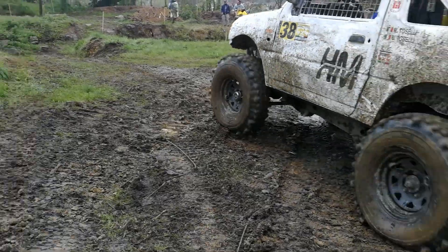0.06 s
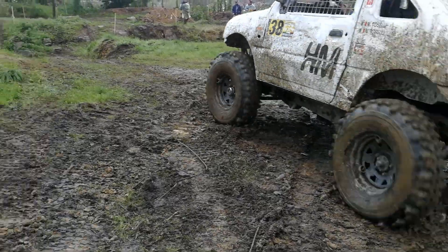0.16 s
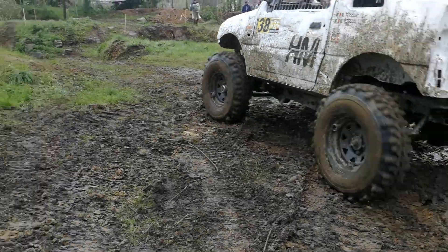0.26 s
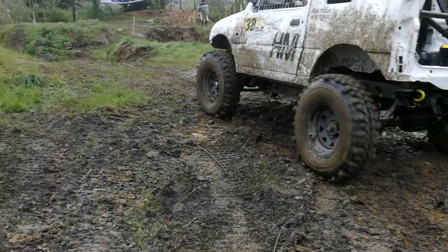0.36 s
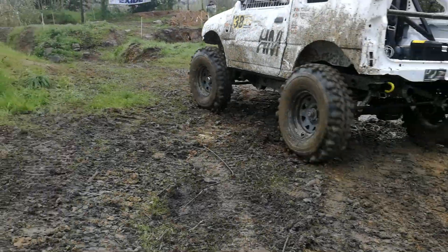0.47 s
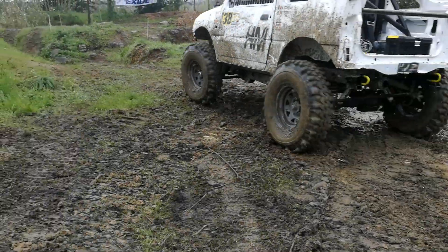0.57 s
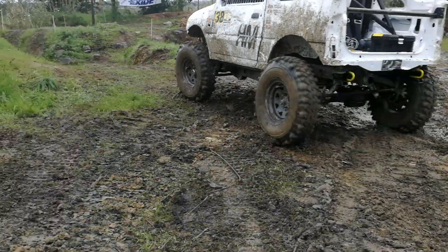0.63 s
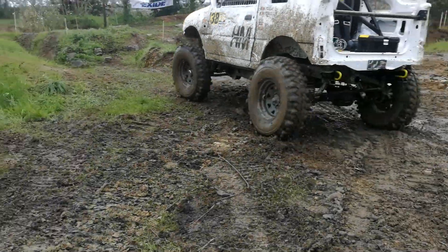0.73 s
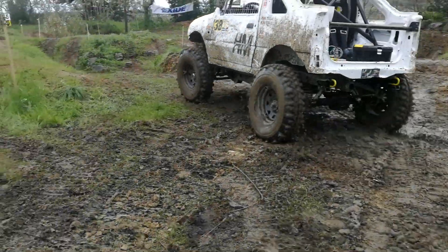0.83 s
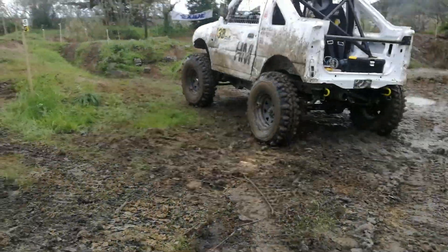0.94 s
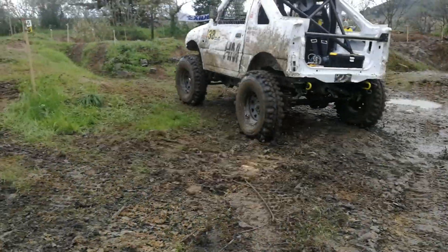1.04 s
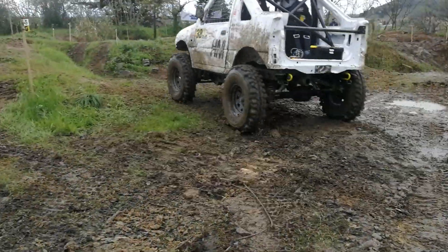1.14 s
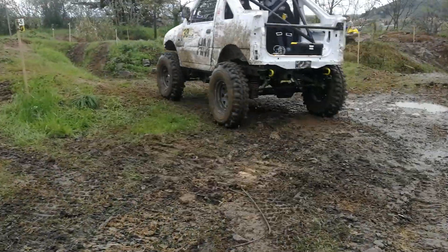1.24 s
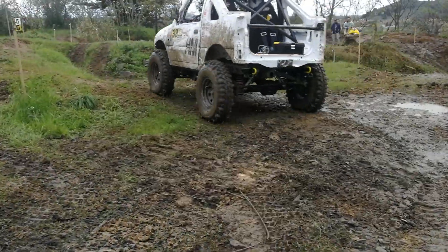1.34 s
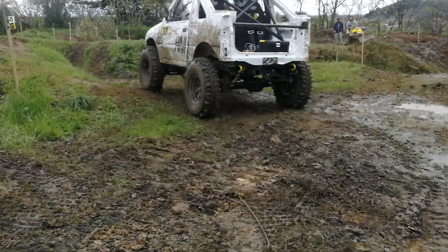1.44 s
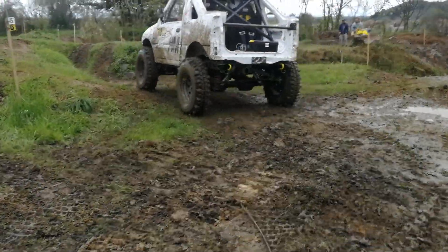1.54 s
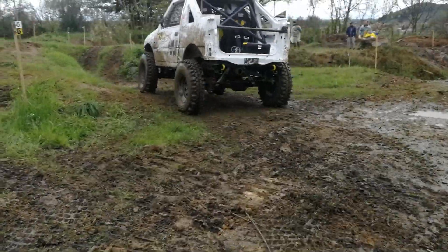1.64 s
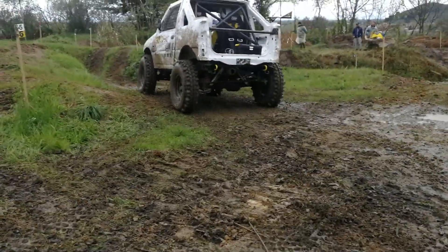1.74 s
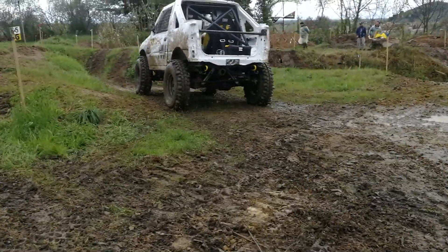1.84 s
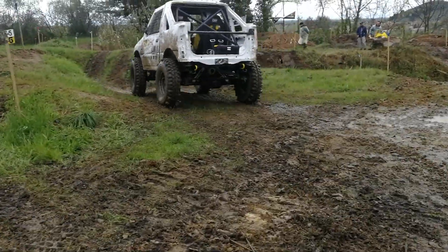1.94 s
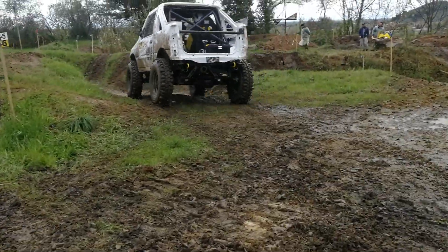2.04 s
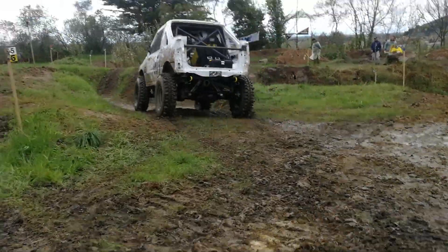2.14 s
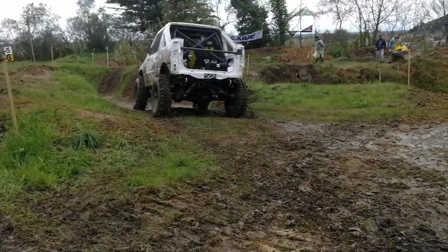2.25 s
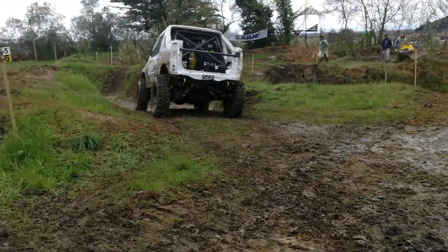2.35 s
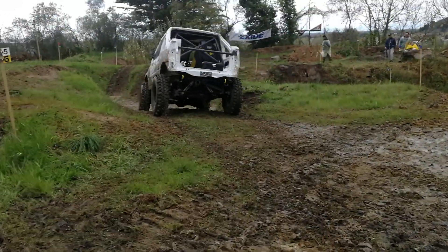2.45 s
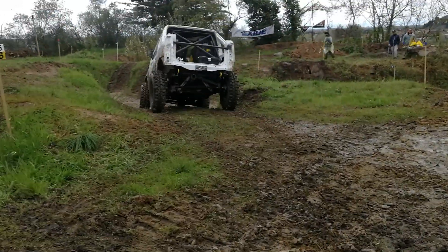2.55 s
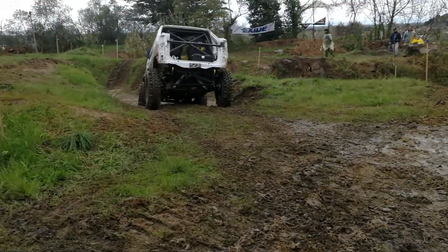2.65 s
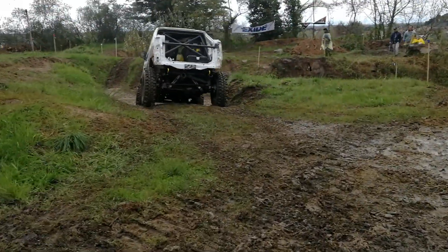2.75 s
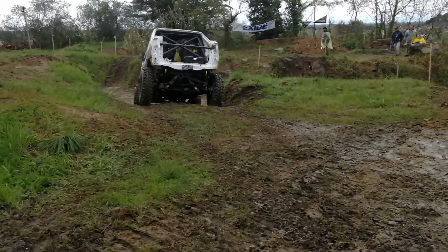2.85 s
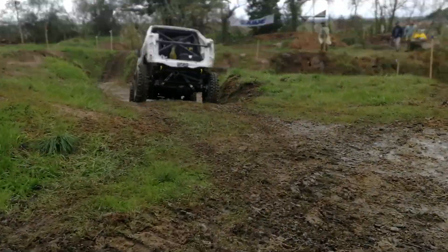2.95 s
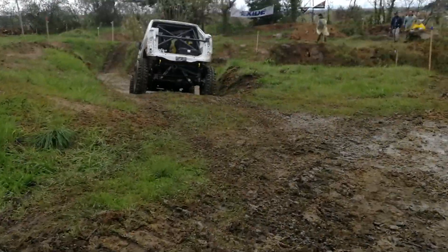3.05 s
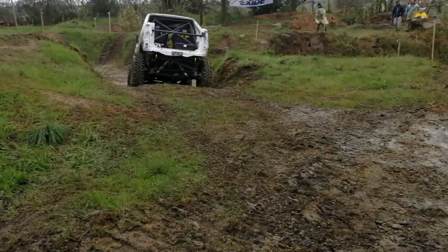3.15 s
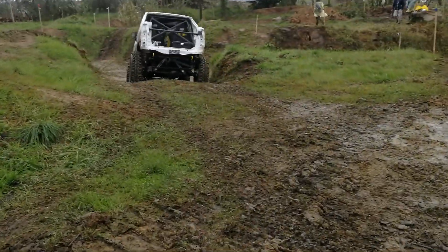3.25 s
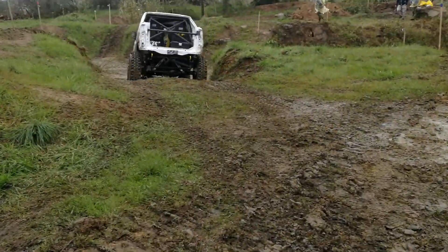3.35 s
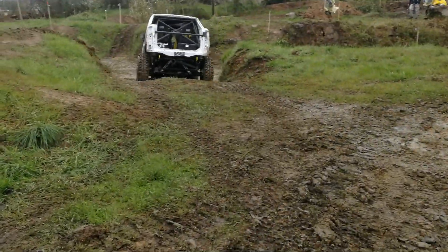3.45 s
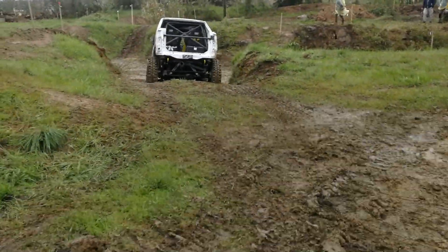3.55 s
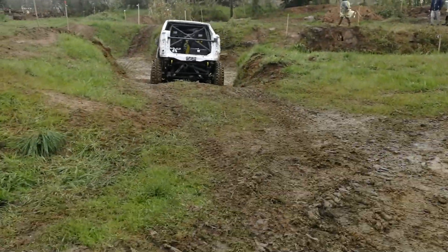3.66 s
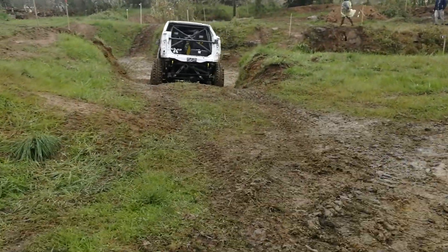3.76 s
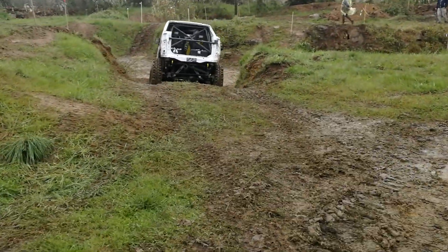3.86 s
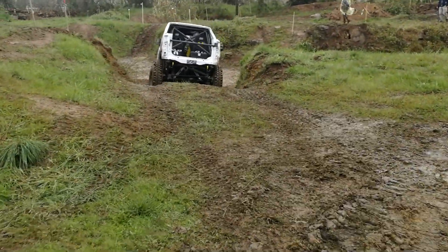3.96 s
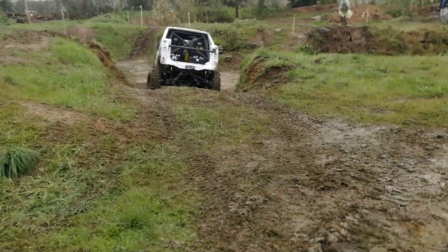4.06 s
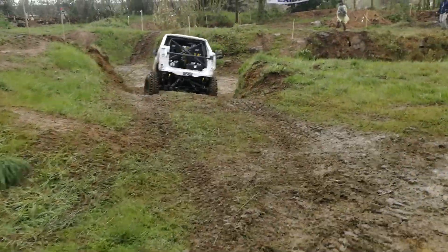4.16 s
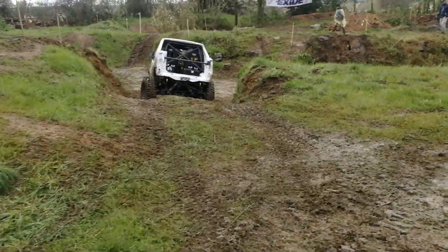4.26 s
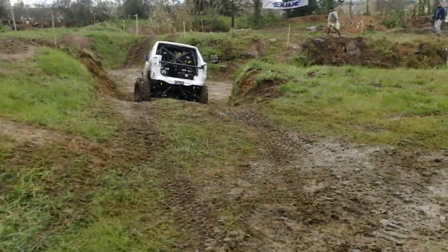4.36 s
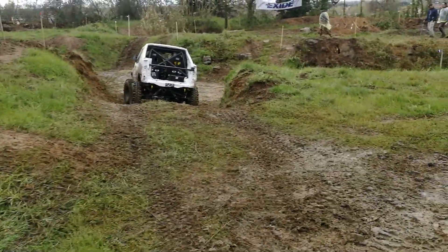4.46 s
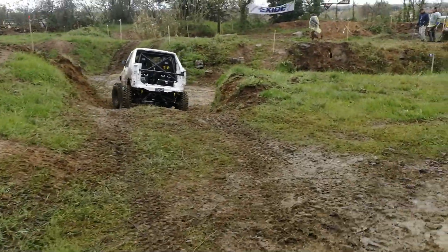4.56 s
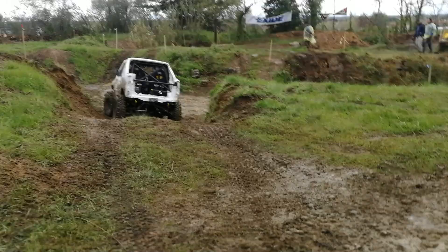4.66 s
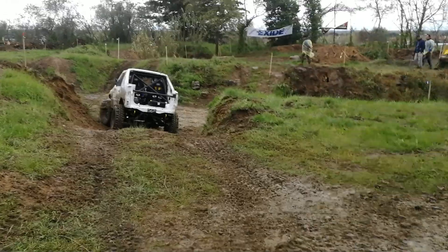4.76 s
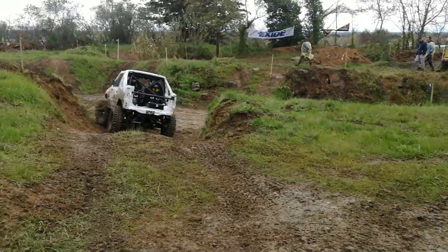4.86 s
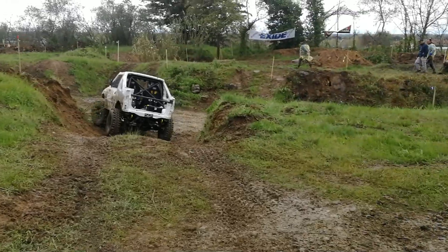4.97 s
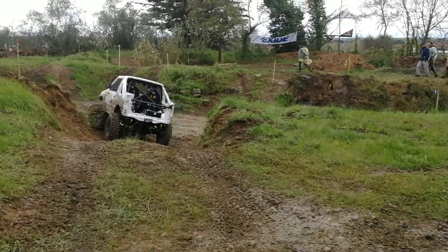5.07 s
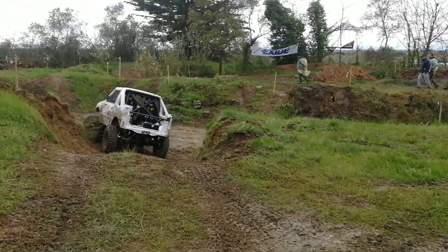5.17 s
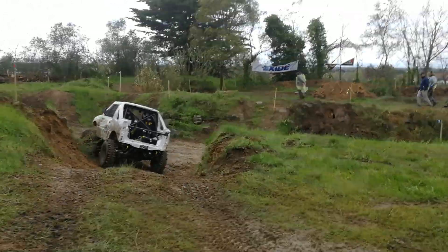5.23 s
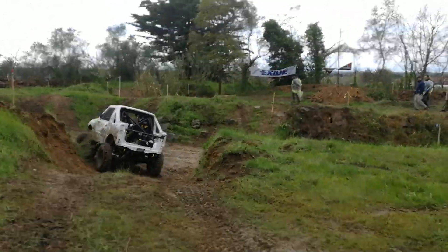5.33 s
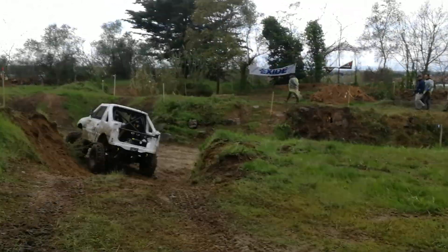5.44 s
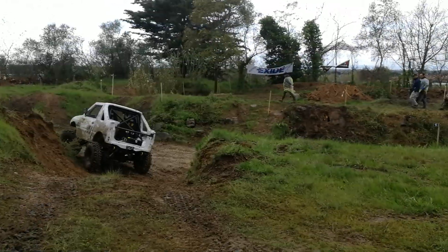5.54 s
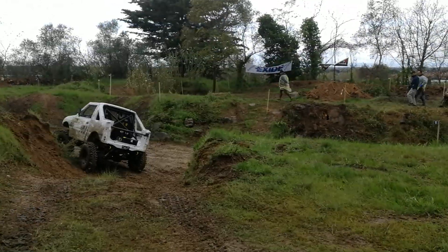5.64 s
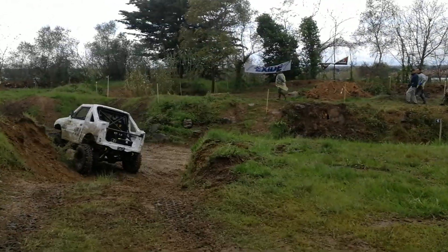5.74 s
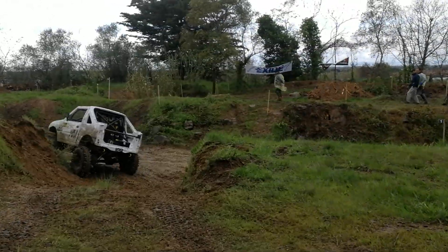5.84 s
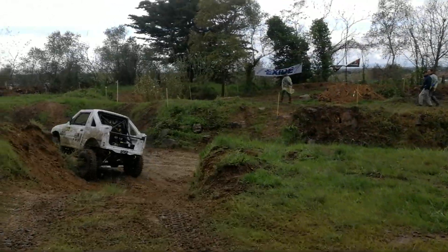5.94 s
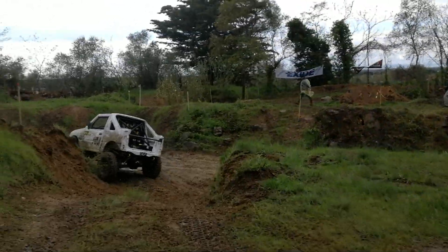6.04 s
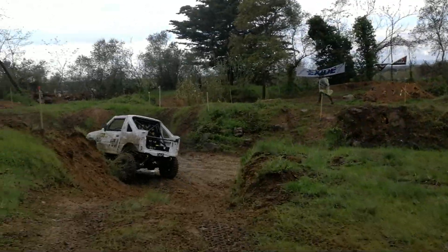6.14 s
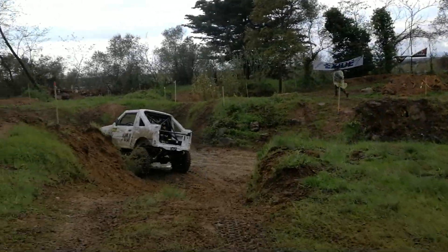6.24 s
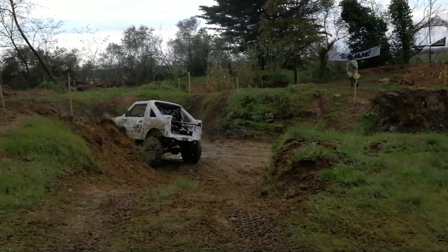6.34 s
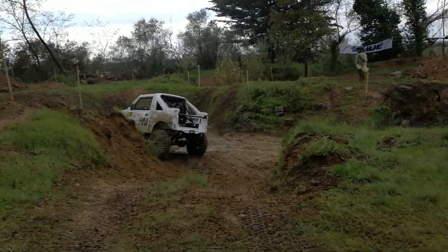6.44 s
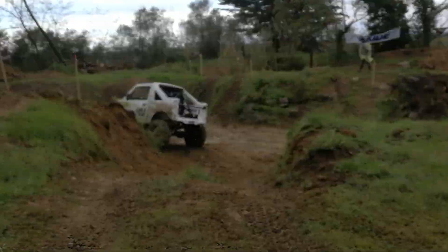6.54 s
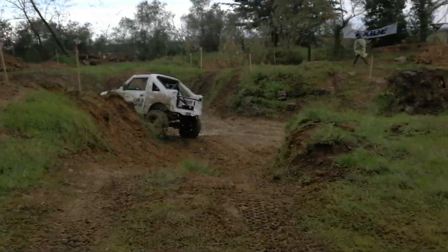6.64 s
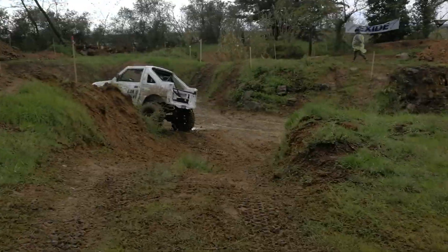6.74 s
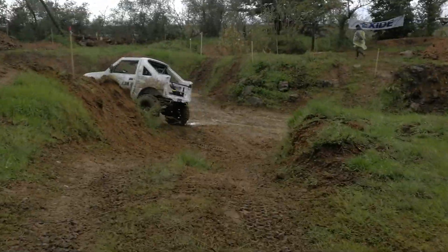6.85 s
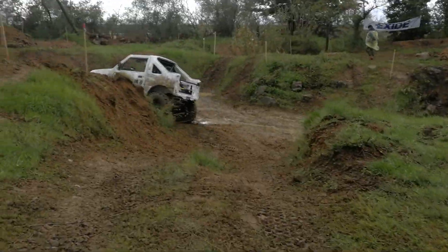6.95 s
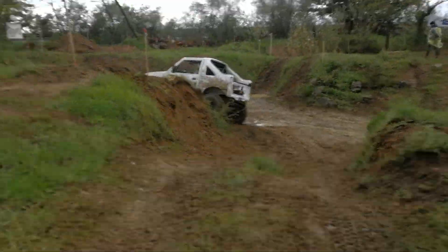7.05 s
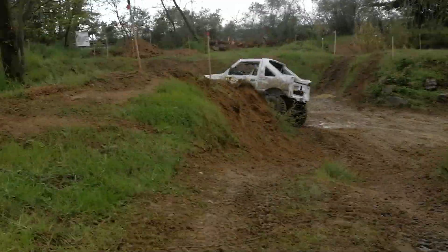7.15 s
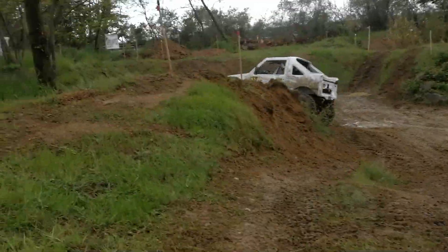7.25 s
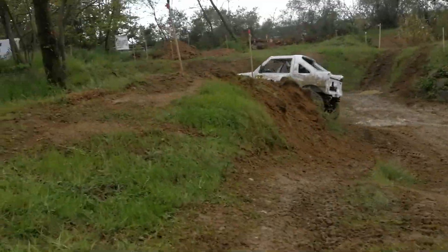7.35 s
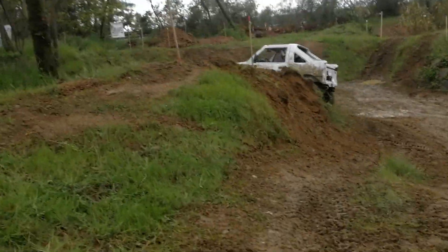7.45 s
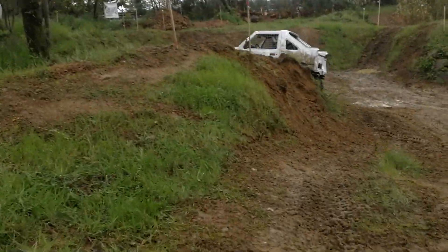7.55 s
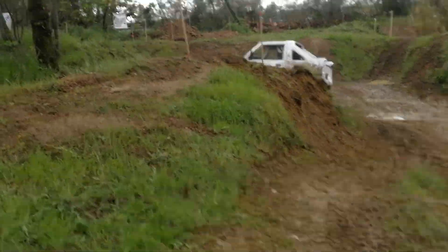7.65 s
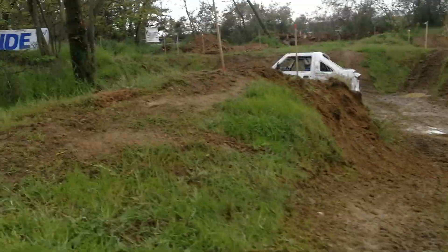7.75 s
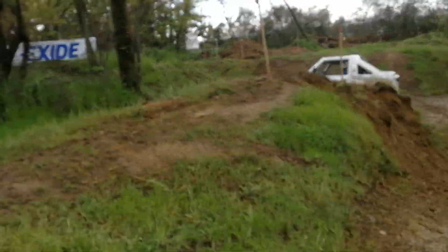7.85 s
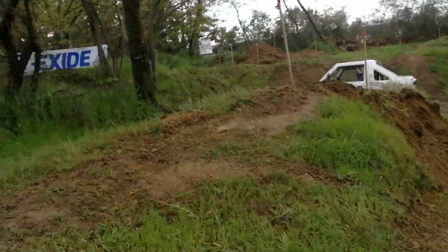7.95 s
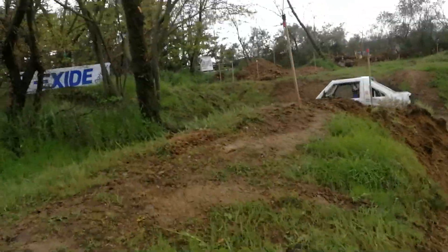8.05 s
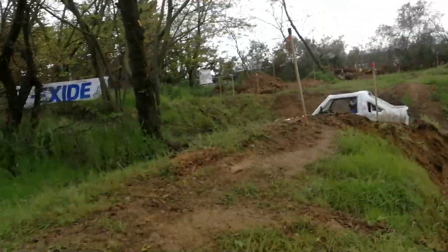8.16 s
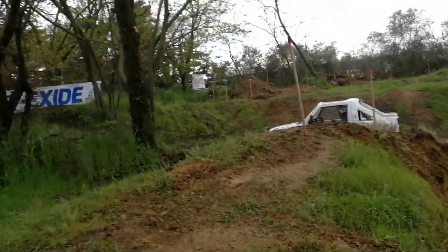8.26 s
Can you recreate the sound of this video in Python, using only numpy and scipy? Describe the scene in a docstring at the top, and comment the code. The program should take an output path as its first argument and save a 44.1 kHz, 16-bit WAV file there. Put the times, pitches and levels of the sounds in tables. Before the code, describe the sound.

An off-road truck's loud open exhaust revs up and down through mud, with sharp backfire bangs as the throttle eases.

```python
"""A four-cylinder off-road truck with an open exhaust pulls through mud and up a bank in bursts of throttle.
Its firings sound the pipe's low note and, under load, make it rasp. On light throttle one cylinder
fires weakly; on lift-off unburnt fuel bangs in the pipe. Tyres squelch, a brake sings faintly and
the chassis knocks, in an open field edged by banks and trees."""
import sys
import numpy as np
from scipy import signal
from scipy.fft import rfft, irfft, next_fast_len
from scipy.io import wavfile
from scipy.ndimage import uniform_filter1d, map_coordinates

SR = 44100
rng = np.random.default_rng(int(sys.argv[2]) if len(sys.argv) > 2 else 0)


def unload_audio(sound):
    """Save the sound as a 16-bit wav file, at the path given as the first command line argument."""
    columns = np.transpose(np.atleast_2d(sound))
    # keep every value between -1 and 1, then stretch to whole-number steps
    steps = np.round(np.clip(columns, -1, 1) * 32767)
    wavfile.write(sys.argv[1], SR, steps.astype(np.int16))


N = 366030
NOW = np.arange(N) / SR
TOP_HZ = 16200
LEFTWARD = np.array([[.5], [-.5]])  # shares a left-minus-right level between the channels


def amp(db):
    """Decibels to gain."""
    return 10 ** (np.asarray(db) / 20)


def unit(x):
    """x at rms 1."""
    return x / np.sqrt(np.mean(x ** 2) + 1e-20)


def along(points, hz):
    """Reads (hz, value) points on a log axis."""
    f, v = np.transpose(points)
    return np.interp(np.log(hz + 1), np.log(f + 1), v)


def curves(rows):
    """One value per sample for each column after the time."""
    s, *cols = np.transpose(rows)
    return [np.interp(NOW, s, c) for c in cols]


def swells(rows):
    """Rounded swells from rows of (middle_s, length_s, height)."""
    return sum(height * np.exp(-np.square(np.square(2 * (NOW - s) / length)))
               for s, length, height in rows)


def wobble(rate):
    """A smooth random curve, rate knots a second."""
    return map_coordinates(rng.standard_normal(int(N * rate / SR) + 4), [NOW * rate])


def white():
    """Two unrelated white noises."""
    return rng.standard_normal((2, N))


def add(track, s, sound):
    """Lays a sound into a track at time s."""
    part = track[..., round(s * SR):][..., :sound.shape[-1]]
    part += sound[..., :part.shape[-1]]


def filtered(x, response):
    """x times a complex response of frequency."""
    m = next_fast_len(N + SR // 2)
    return irfft(rfft(x, m) * response(np.fft.rfftfreq(m, 1 / SR)), m)[..., :N]


def bandpass(x, low_hz, high_hz):
    """x through a gentle band filter."""
    return signal.sosfilt(signal.butter(2, [low_hz, high_hz], "band", fs=SR, output="sos"), x)


def ringing(x, spectrum, size=4096):
    """x through a causal filter with the given spectrum."""
    cepstrum = irfft(np.log(amp(along(spectrum, np.fft.rfftfreq(size, 1 / SR))) + 1e-6))
    cepstrum[1:size // 2] *= 2
    cepstrum[size // 2:] = 0
    kernel = irfft(np.exp(rfft(cepstrum)))
    return filtered(x, lambda hz: rfft(kernel / np.linalg.norm(kernel), 2 * (len(hz) - 1)))


def resonances(modes, hz):
    """Response of modes given as (pitch_hz, width_hz, level_db)."""
    return sum((-1) ** k * amp(db) * 1j * hz * width / (pitch ** 2 - hz ** 2 + 1j * hz * width)
               for k, (pitch, width, db) in enumerate(modes))


# The truck's place in the stereo image: time_s, left_lead_ms, left_minus_right_db
TRUCK_PAN = [(0,-0.21,-8),(.6,-0.14,0),(1.3,0.08,1),(2,0.047,5.5),(3.1,0.14,6),(5.2,0.27,6),(6.6,0.073,6.5),(7.4,0.31,3.5)]


def placed(x, panned=0, delayed=1):
    """One side hears the truck sooner and louder; panned and delayed scale the two cues."""
    lead_ms, tilt_db = curves(TRUCK_PAN)
    samples = np.arange(N)
    shift = delayed * lead_ms * SR / 2000
    pair = np.array([np.interp(samples + side * shift, samples, x) for side in (1, -1)])
    return pair * amp(LEFTWARD * tilt_db * panned)


# Stereo width of the noise layers: frequency_hz, side_minus_mid_db
STEREO_WIDTH = [(60, -29), (110, -18.5), (200, -35), (380, 6), (700, -4), (1290, -12), (2380, 2),
                (4400, -4), (8120, 0.5), (15000, 0)]


def spread(pair, spectrum, panned=0, delayed=1):
    """Two noises become coloured stereo: one from the truck's bearing, one scattered."""
    direct = filtered(pair[0], lambda hz: amp(along(spectrum, hz)))
    side = filtered(pair[1], lambda hz: amp(along(spectrum, hz) + along(STEREO_WIDTH, hz)))
    stereo = placed(direct, panned, delayed) + np.array([side, -side])
    return stereo / np.std(stereo.mean(axis=0))


# Tone of the outdoor bed: frequency_hz, level_db
FIELD_EQ = [(20,4),(45,-10),(100,9),(250,11),(450,-7),(900,-42.5),(1500,-28),(2400,-18),(4000,-27),(16000,-36)]


def open_field():
    """A low rush of air that drifts with the breeze."""
    breeze_db = 2.2 * wobble(4)
    return amp(-40.5 + breeze_db) * spread(white(), FIELD_EQ, delayed=0)


# Reverb time of the banks and trees: frequency_hz, t60_s
BANK_DECAY = [(200,0.041),(1000,0.23),(4000,0.089),(12000,0.2)]


def bank_echo(x):
    """A short scattered answer from the earth banks and trees."""
    hz, t, noise = signal.stft(rng.standard_normal((2, SR // 2)), SR, nperseg=256)
    tail = signal.istft(noise * amp(-60 * t / along(BANK_DECAY, hz)[:, None]), SR, nperseg=256)[1]
    return signal.fftconvolve(x, tail / np.linalg.norm(tail[0]), axes=1)[:, :N]


# Sprays of mud off the tyres: middle_s, length_s, level_db
MUD_SPRAYS = [(0.664, 0.38, -55), (2.777, 0.24, -46.5), (3.03, 0.24, -61), (3.593, 0.36, -53),
              (3.88, 0.16, -53.5), (4.131, 0.072, -54), (4.7, 0.51, -74), (5.122, 0.11, -54),
              (5.366, 0.23, -50.5), (5.851, 0.13, -52), (7.022, 0.05, -59), (7.26, 0.12, -47.5),
              (7.655, 0.23, -48), (7.985, 0.089, -47)]
# Tone of the mid churn, the hiss, the top fizz and the flung specks: frequency_hz, level_db
CHURN_EQ = [(280, -32), (470, -5.5), (515, -24), (570, -14), (641, -7.5), (1010, -11), (1590, -16.5),
            (1880, -18), (2100, -23), (3120, -54.5), (5280, -120)]
HISS_EQ = [(1120, 0.5), (1850, -1.5), (2100, -5.5), (2710, -9.5), (3600, -6.5), (4030, -5), (5420, -11.5),
           (7000, -16), (9100, -38), (15400, -120)]
FIZZ_EQ = [(3240, 0), (5500, -2), (7290, 0), (9070, -3.5), (11300, -15.5), (12800, -15), (15200, -28),
           (15800, -19), (16300, -50)]
SPECK_EQ = [(900,-43),(2200,-8),(4500,4.5),(8000,1.5),(13000,-8.5),(16000,-23.5)]


def tyres_and_mud():
    """Churning mud and the engine bay's rush; they make up the treble when the throttle eases."""
    load, _ = load_and_roughness()
    rasp_db, hiss_db = curves(RASP_AND_HISS)
    pull = swells(HARD_PULLS)
    spray = swells([(s, length, amp(db)) for s, length, db in MUD_SPRAYS])
    wet = lambda depth_db: white() * amp(depth_db * wobble(350) + 2.1 * wobble(30))
    churn = amp(rasp_db - 1.5) * np.sqrt(1 - .88 * np.sqrt(load)) * spread(wet(2), CHURN_EQ, panned=1)
    rush = amp(hiss_db + 3.5) * np.sqrt(1 - np.clip(pull, 0, 1))
    hiss = np.hypot(rush, amp(-19) * spray) * spread(wet(2), HISS_EQ, delayed=0.33)
    fizz_db = hiss_db + 2 - 12.5 * load ** 2 - 3.9 * pull
    fizz = np.hypot(amp(fizz_db), spray) * spread(wet(1.5), FIZZ_EQ, delayed=0)
    # about 110 specks a second: many tiny ticks and a few clear ones
    specks = (rng.random(N) < 110 / SR) * amp(5.5 * rng.standard_normal(N))
    ticks = placed(unit(ringing(specks, SPECK_EQ)), panned=1)
    spatter = amp(-8) * np.hypot(amp(hiss_db), spray) * ticks
    return churn + amp(-2.5 * LEFTWARD) * (hiss + fizz) + spatter


# Suspension and stone hits: start_s, peak_db, pitch_hz
CHASSIS_KNOCKS = [(1.498, -27, 9300), (4.344, -35, 2420), (4.835, -30.5, 5390), (6.97, -35, 8840),
                  (7.03, -38, 9380), (7.251, -35, 980), (7.614, -39, 894), (7.698, -39, 900),
                  (7.801, -29.5, 997), (7.805, -34, 445), (7.922, -39, 600), (7.865, -29.5, 509),
                  (7.947, -32, 648), (7.975, -30, 720), (8.002, -28, 1550), (8.051, -36, 1312),
                  (8.096, -32, 715), (8.213, -35.5, 6220), (8.253, -30, 4800)]
# Thin singing tones, from the brakes and once from the pipe: middle_s, length_s, pitch_hz, level_db
THIN_SQUEALS = [(1.645, .11, 443, -33), (2.126, 0.12, 3366, -48.5), (3.23, 0.2, 3300, -53),
                (4.355, 0.08, 2310, -50)]
# Metallic scrapes, rings and clinks: middle_s, length_s, pitch_hz, width_hz, level_db
METAL_SCRAPES = [(.04, 0.22, 1410, 400, -31.5), (.04, .2, 3200, 1300, -39.5), (1.36, 0.27, 1900, 250, -47),
                 (3.55, 0.54, 3274, 250, -62), (4.15, 1.4, 2293, 250, -61), (5.866, .035, 3020, 300, -51),
                 (6.117, 0.42, 4200, 1400, -53)]


def chassis():
    """Short knocks from the suspension and flung stones, fluttering squeals and narrow scrapes."""
    out, t = np.zeros((2, N)), np.arange(SR // 4) / SR
    for s, db, hz in CHASSIS_KNOCKS:
        noise = rng.standard_normal(len(t)) + .5 * rng.standard_normal((2, len(t)))
        knock = bandpass(noise * amp(-60 * t / 0.047), hz * 0.6, min(hz * 1.29, TOP_HZ))
        add(out, s, amp(db) * knock / np.abs(knock).max())
    for s, length, hz, db in THIN_SQUEALS:
        envelope = amp(db + 3 * wobble(37)) * np.exp(-(2 * (NOW - s) / length) ** 2)
        pitch_hz = hz * (1 + 0.0051 * wobble(83))
        out += envelope * np.sin(2 * np.pi * np.cumsum(pitch_hz) / SR)
    for s, length, hz, width, db in METAL_SCRAPES:
        scrape = filtered(white(), lambda f: resonances([(hz, width, 0)], f) ** 2)
        out += swells([(s, length, amp(db))]) * unit(scrape)
    return out


# Bangs, each with its own mix: start_s, crack_db, boom_db, treble_over_crack_db, bark_db, bark_hz
AFTERFIRE_BANGS = [(1.583, -24, -4, -16, -40, 970), (1.606, -18, -4, -28.5, -46, 903.4),
                   (1.637, -27.5, -2.5, -24, -41, 1050), (1.665, -34, -5.5, -30, -33.5, 920),
                   (1.87, 3, -5.5, -9, -36, 1178), (1.976, -4.5, -2.5, -4, -31.5, 1076),
                   (2.22, 3, -4.5, -10, -40, 1132), (2.282, -12.5, -3.5, -1.5, -41, 1199),
                   (2.553, -12.5, -7, 4, -34, 740), (3.054, -8, -7.5, 2.5, -31, 757),
                   (3.189, -39.5, -21, -4, -43, 764), (3.248, -41, -33, -3, -45, 781),
                   (3.456, -13, -12.5, -0.5, -26.5, 800), (3.565, -33.5, -14, -8, -47, 624),
                   (3.641, -42.5, -19, -19, -48, 519), (4.887, -32, -13, -21, -42, 850),
                   (4.907, -36, -17, -22, -37, 690), (4.922, -32, -17, -22, -36, 700),
                   (4.938, -35, -13, -28, -42, 930)]
# The slap off the ground, sooner as the truck draws away: time_s, delay_ms
GROUND_SLAP = [(1.9, 0.69), (2.25, 0.5), (2.55, .42), (3.05, 0.32), (3.5, 0.34), (5, .25)]
# Tone of the crack: frequency_hz, level_db
CRACK_EQ = [(40, -15), (130, 2), (290, 1.5), (600, -2), (850, 2), (1200, 8), (1600, 0), (1950, 6),
            (2400, -3.5), (2850, -1), (4000, -2), (5090, -7.5), (7640, -9), (8500, -14), (12900, -16.5),
            (16000, -24.5)]


def afterfire():
    """Fuel explodes in the pipe: a shock front, its ground bounce, a spit of gas, a bark and a boom."""
    t = np.arange(SR // 4) / SR
    dull, sharp, booms, barks = np.zeros((4, N))
    gas_decay = 0.078 * amp(-60 * t / 0.038) + 0.014 * amp(-60 * t / 0.12)
    for s, crack_db, boom_db, treble_db, bark_db, bark_hz in AFTERFIRE_BANGS:
        shock = rng.standard_normal(len(t)) * gas_decay
        shock[0] += 1
        slap_ms = np.interp(s, *np.transpose(GROUND_SLAP))
        shock[round(slap_ms * SR / 1000)] += 0.52
        bark = bandpass(shock, bark_hz / 1.26, bark_hz * 1.26)
        add(barks, s + 0.00107, amp(bark_db) * bark / np.std(bark[:SR // 40]))
        add(dull, s + 0.001098, amp(crack_db + 11.5) * shock)
        add(sharp, s + 0.001106, amp(crack_db + treble_db + 17.5) * shock)
        add(booms, s + 0.0017, amp([boom_db + 45]))
    body = filtered(dull, lambda hz: 1 / (1 + 1j * hz / 2200) ** 2)
    snap = filtered(sharp, lambda hz: (1j * hz / (1500 + 1j * hz)) ** 2)
    crack = amp(-4.5 - 5 * LEFTWARD) * placed(ringing(body + snap, CRACK_EQ), delayed=0.18)
    return crack + amp(6 * LEFTWARD) * placed(barks) + placed(filtered(booms, pipe))


# The revs: time_s, firing_rate_hz
REVS = [(0.0, 122.5), (0.23, 110.0), (0.42, 113.0), (0.66, 123.5), (0.85, 118.0), (1.04, 110.7),
        (1.35, 121.0), (1.49, 120.0), (1.62, 102.0), (1.77, 97.5), (2.04, 90.6), (2.33, 91.0), (2.64, 74.7),
        (2.9, 76.2), (3.3, 70.6), (3.7, 72.1), (4.0, 77.6), (4.26, 77.3), (4.58, 73.0), (4.72, 63.0),
        (4.86, 58.0), (5.01, 76.0), (5.27, 91.0), (5.48, 86.7), (5.66, 75.2), (6.1, 74.3), (6.32, 78.4),
        (6.65, 100.0), (6.8, 102.0), (6.98, 97.8), (7.33, 77.0), (7.67, 71.0), (7.99, 52.0), (8.15, 51.3),
        (8.3, 54.0)]
# The driver's foot: time_s, note_level_db, load (0-1)
PEDAL = [(0.0, -9, 0.46), (0.22, -12.5, 0.44), (0.58, -9, 0.4), (0.98, -13, 0.4), (1.4, -10, 0.33),
         (1.5, -15, 0.26), (1.56, -19.5, 0.69), (1.66, -13, 0.59), (1.8, -14, 0.67), (2.1, -14.5, 0.69),
         (2.54, -15, 0.54), (2.59, -19.5, 0.17), (2.69, -19, 0.3), (2.73, -15.5, 0.64), (3.05, -17.5, 0.53),
         (3.08, -27.5, 0.57), (3.36, -22, 0.35), (3.62, -35.5, 0.28), (4.05, -19.5, 0.02),
         (4.45, -30, 0.32), (4.6, -30.5, 0.28), (4.68, -23.5, 0.13), (4.82, -27.5, .1), (4.865, -41, 0.18),
         (4.9, -20.5, 0.16), (5.25, -14.5, 0.27), (5.5, -16, 0.21), (5.68, -22, 0.01), (6.12, -18.5, 0.12),
         (6.3, -18.5, 0.23), (6.52, -12, 0.31), (6.7, -14, 0.6), (6.85, -15.5, 0.72), (7.12, -17, 0.06),
         (7.34, -24.5, 0.01), (7.52, -22, 0.01), (7.76, -40.5, 0.31), (8.1, -40.5, 0.24), (8.3, -33, 0.1)]
# Spells of rough, uneven firing: middle_s, length_s, added_roughness (0-1)
ROUGH_SPELLS = [(1.67, .22, .25), (2.1, .85, .1), (2.66, .2, 0.18), (3.65, 0.41, 0.28), (4.6, .5, .1),
                (8.0, 0.54, 0)]
CRUISE_HZ = 80


def load_and_roughness():
    """The engine runs rougher at light load and in brief spells, more evenly above cruising revs."""
    load = np.clip(curves(PEDAL)[1], 0, 1)
    smoothing = np.minimum(CRUISE_HZ / curves(REVS)[0], 1) ** 1.8
    rough = (0.078 + .05 * (1 - load)) * smoothing + swells(ROUGH_SPELLS)
    return load, np.clip(rough, 0, 1)


# One cylinder limps on light throttle: middle_s, length_s, loss (0-1)
WEAK_CYLINDER = [(.3, 0.35, 0.47), (1.1, 0.87, 0.46), (3.3, 0.28, 0.5), (4.45, 0.37, 0.8),
                 (5.95, 0.65, 0.82), (7.45, 0.31, 0.5)]


def firings():
    """Four cylinders fire in turn: the running count, each firing's sample and its strength."""
    rate = uniform_filter1d(curves(REVS)[0], size=3000)  # the flywheel rounds every change of speed
    _, rough = load_and_roughness()
    count = np.cumsum(rate * (1 + .05 * rough * wobble(70))) / SR
    at = np.flatnonzero(np.diff(np.floor(count)))
    loss = np.clip(swells(WEAK_CYLINDER), 0, 1)[at]
    weak = np.arange(len(at)) % 4 == 0
    strength = (1 - loss * weak) / (1 - loss / 4) + rough[at] * rng.standard_normal(N)[:len(at)]
    return count, at, np.maximum(strength, 0)


# Blats at the tops of the revs: middle_s, length_s, level_db, pitch_hz
REV_BLATS = [(0.59, 0.16, -30, 960), (1.304, 0.26, -32, 960), (6.622, 0.23, -37.5, 792)]
# Tone of a blat pitched at BLAT_HZ: frequency_hz, level_db
BLAT_EQ = [(500, -56), (640, -1), (725, -1.5), (830, -6.5), (960, -0.5), (1070, -11), (1180, -7),
           (1280, -17), (2000, -25), (4000, -105)]
BLAT_HZ = 960


def blats(pulses):
    """The firing pulses make the pipe bark as the revs peak."""
    out = np.zeros(N)
    for s, length, db, hz in REV_BLATS:
        tuned = [(f * hz / BLAT_HZ, gain) for f, gain in BLAT_EQ]
        out += swells([(s, length, amp(db))]) * unit(ringing(pulses, tuned))
    return out


# Fader rides shared by the pipe and the mud: time_s, rasp_db, hiss_db
RASP_AND_HISS = [(0, -25, -35.5), (.19, -35, -44.5), (.56, -27.5, -41), (.98, -32.5, -45.5),
                 (1.3, -32.5, -44.5), (1.62, -38, -44), (2.53, -44.5, -46.5), (2.6, -48.5, -53.5),
                 (3.05, -47.5, -53.5), (3.45, -52.5, -61.5), (4.05, -50, -61.5), (4.86, -56, -55.5),
                 (4.9, -45.5, -51), (5.0, -47.5, -57.5), (5.28, -40, -63), (5.65, -54, -61.5),
                 (6.12, -50, -58), (6.35, -45, -43.5), (6.56, -34.5, -41), (6.69, -34, -39.5),
                 (6.85, -46.5, -43), (7.05, -54, -56), (7.45, -56, -57), (7.95, -52, -55), (8.3, -52, -54)]
# Hard pulls, where the hiss comes in puffs: middle_s, length_s, hiss_share (0-1)
HARD_PULLS = [(.6, 0.32, 0.2), (2.2, 0.76, 0), (6.55, 0.72, 0.99)]
# Single hard firings that spit gas: time_s, boost_db
GAS_SPITS = [(.434, 0.5), (.545, 3.5), (6.349, 3.5), (6.421, 0), (6.467, 8), (6.534, 6)]
# Ring of the pipe's thin wall: pitch_hz, width_hz, level_db
WALL_MODES = [(785, 23, 4.5), (1290, 130, 0.5), (1660, 140, -1), (2680, 130, 0), (3210, 120, 5),
              (4010, 120, 5), (4880, 110, -6.5), (6780, 200, -9.5)]
# Gas sizzling near the tailpipe: middle_s, length_s, level_db
TAILPIPE_SIZZLES = [(.04, .16, -49), (.66, .5, -46.5)]
# Tone of the rasp, the puffs and the sizzle: frequency_hz, level_db
RASP_EQ = [(60, -50), (250, -25.5), (430, 3.5), (480, 10.5), (521, -5.5), (554, -44.5), (635, 3.5),
           (708, 6.5), (768, 11), (887, 3.5), (970, 4.5), (1150, 3), (1330, -4), (1850, -12), (2200, -29.5),
           (2860, -53), (4840, -120)]
PUFF_EQ = [(760, -17.5), (1200, 3), (1650, 0.5), (2000, -29), (2250, -21), (2600, -13), (2960, -16.5),
           (3180, -5), (3380, -2.5), (3650, -11), (4100, -4), (4700, -3), (5900, -11), (7280, -8),
           (9500, -26.5), (12400, -47.5), (20900, -120)]
SIZZLE_EQ = [(2500, -24.5), (4500, -10), (6500, 4), (8200, 0), (10000, -16), (15000, -27.5)]
HEADER_S, JITTER_S = .00006, .00004  # timing: each cylinder's own length of pipe; random scatter


def rasp(count, at, strength):
    """Under load each firing leaves as a steep pulse that rings the pipe's wall, then a puff of gas."""
    load, _ = load_and_roughness()
    rasp_db, hiss_db = curves(RASP_AND_HISS)
    scatter_db, lateness = white()[:, at]
    size = strength * amp(scatter_db)
    gas = size.copy()
    for s, db in GAS_SPITS:
        gas[np.argmin(np.abs(at - s * SR))] *= amp(db)
    index = np.arange(len(at))
    delay_s = HEADER_S * np.sin(np.pi * index / 2)
    delay_s += lateness * (JITTER_S + .004 * swells(ROUGH_SPELLS)[at])
    starts = np.clip(at + np.round(delay_s * SR), 0, N - 1).astype(int)
    pulses = np.bincount(starts, size, N)
    buzz = load ** .25 * amp(rasp_db + 1) * unit(ringing(pulses, RASP_EQ))
    pull = np.sqrt(np.clip(swells(HARD_PULLS), 0, 1)) * amp(hiss_db)
    ring = unit(filtered(np.bincount(starts, gas, N), lambda hz: resonances(WALL_MODES, hz)))
    wall = placed(amp(-4.5) * pull * ring, delayed=0.33)
    held_gas = np.interp(np.floor(count), index + 1, gas)
    bursts = lambda decay_cycles: white() * unit(np.exp(-(count % 1) / decay_cycles) * held_gas)
    puff = amp(1) * pull * spread(bursts(decay_cycles=0.24), PUFF_EQ, delayed=0.29)
    sizzle_gain = swells([(s, length, amp(db)) for s, length, db in TAILPIPE_SIZZLES])
    sizzle = sizzle_gain * spread(bursts(decay_cycles=0.22), SIZZLE_EQ, delayed=0)
    return placed(buzz + blats(pulses), panned=0.56) + wall + puff + sizzle


# The pipe's low resonances: pitch_hz, width_hz, level_db
PIPE_MODES = [(108.5,30,-4),(186,27.5,-0.5),(240.2,33.6,-1.5),(347,62,-6.5),(354.4,23,-3.5),(395,100,-31)]


def pipe(hz):
    """The standing waves of the exhaust pipe; little escapes below the lowest."""
    return resonances(PIPE_MODES, hz) * (1j * hz / (70 + 1j * hz)) ** 2 / (1 + (hz / 520) ** 6)


# Harmonics 1-4 of the firing rate: no_load_db, full_load_gain_db, gain_per_octave_db, chug_depth
NOTE_HARMONICS = [(-4.5, 18.5, 15.5, 0.11), (15, -15, 2, 0.64), (4.5, -6.5, -15, 0.52),
                  (-6, 4.5, -8.5, 2.64)]
# How well the pipe passes the note: frequency_hz, gain_db
NOTE_EQ = [(55, 15), (75, 1), (95, 2), (120, -5.5), (150, -4), (180, 2.5), (205, 2.5), (235, 8.5),
           (262, 1.5), (300, 3.5), (350, 3), (405, -19.5), (490, -4)]
# Shifts of colour, by harmonic: middle_s, length_s, first_db, second_db, third_db, fourth_db
NOTE_COLOURS = [(.3, 0.38, 4, 3.5, -13.5, -3), (1.15, 0.86, 3, 0, 1.5, 3),
                (1.72, 0.17, -3.5, -8.5, -1.5, 0), (2.1, 0.26, -1.5, -0.5, 4, -0.5),
                (2.45, 0.17, 0.5, 0.5, 3.5, -1.5), (2.88, 0.58, -3, 9.5, -1, -3),
                (3.33, 0.31, -2, 2.5, -1.5, -3.5), (4.72, .24, 0, 0, 2, 5),
                (5.02, 0.28, -3, 1.5, -3.5, 1.5), (5.38, 0.38, -1, 0.5, -0.5, 3),
                (5.75, 0.43, -5.5, -3.5, 0, 3), (6.31, .18, 6, 5, -4, 9.5), (6.56, 0.18, -1, -2.5, 4, -11),
                (7.52, 0.58, 1.5, -3, 3.5, -17), (8.05, .6, -2, -2.5, -10, 5)]
SAG_S, SAG_DEPTH, FULL_SAG_DB = 0.017, 0.57, -9.5  # booms under FULL_SAG_DB duck the note less


def harmonic_levels(load):
    """Load, revs and the pipe's resonances balance the harmonics; the note sags after each bang."""
    rate = curves(REVS)[0]
    shares = []
    for k, (db, load_db, octave_db, _) in enumerate(NOTE_HARMONICS, 1):
        drive_db = db + load_db * load + octave_db * np.log2(rate / CRUISE_HZ)
        colour_db = swells([(s, length, gains[k - 1]) for s, length, *gains in NOTE_COLOURS])
        waver_db = (k > 2) * 1.8 * wobble(5.3)
        shares.append(amp(along(NOTE_EQ, k * rate) + drive_db + colour_db + waver_db))
    sag = np.max([min(amp(boom_db - FULL_SAG_DB), 1) * np.exp(-np.square((NOW - s) / SAG_S - 1))
                  for s, _, boom_db, *_ in AFTERFIRE_BANGS], axis=0)
    level = amp(curves(PEDAL)[0]) * (1 - SAG_DEPTH * sag)
    return level * np.array(shares) / np.linalg.norm(shares, axis=0)


# Tone of the chug of uneven firings, and of the pipe's higher modes: frequency_hz, level_db
CHUG_EQ = [(50, 1.5), (100, -16), (160, 4), (205, -4), (245, 11), (290, 2.5), (380, 0.5), (450, -14)]
UPPER_MODES_EQ = [(300,-59.5),(365,1),(400,5.5),(440,-1),(480,-7),(530,-9.5),(620,-30.5),(760,-66.5)]


def exhaust(count, at, strength):
    """The low note swings with each firing's strength; uneven burns set the pipe burbling."""
    load, rough = load_and_roughness()
    levels = harmonic_levels(load)
    cycles = count - .23  # the pipe answers a part of a cycle after the valve opens
    swing = np.interp(cycles, np.arange(len(at)) + 1, strength) - 1
    depth = np.array(NOTE_HARMONICS)[:, -1:]
    orders = np.arange(1, len(levels) + 1)[:, None]
    smear = 1.18 * (1 - load) ** 2 * (orders - 2) ** 2  # soft pulses spread out, hard ones stay steep
    partials = -np.sqrt(2) * levels * np.cos(2 * np.pi * orders * cycles - smear)
    chug = filtered(swing * np.sum(depth * partials, axis=0), lambda hz: amp(along(CHUG_EQ, hz)))
    note = partials.sum(axis=0) + chug
    overtone_level = np.linalg.norm(levels[1:], axis=0)
    uneven, pulses = np.zeros((2, N))
    uneven[at] = rng.standard_normal(N)[at]
    pulses[at] = strength
    burble = amp(4.5) * rough * overtone_level * unit(filtered(uneven, pipe))
    upper = amp(-28) * overtone_level * unit(ringing(pulses, UPPER_MODES_EQ))
    return placed(amp(-0.4) * note + burble + upper)


def scene():
    """The truck and the echo of its sharper sounds over the low rush of the open field."""
    fire = firings()
    sharp = afterfire() + chassis() + rasp(*fire)
    field = open_field()
    return exhaust(*fire) + sharp + amp(-14) * bank_echo(sharp) + tyres_and_mud() + field


def record(dry):
    """Peaks clip at full scale and everything above TOP_HZ is cut."""
    return filtered(np.clip(dry, -1, 1), lambda hz: hz < TOP_HZ)


dry = scene()
out = record(dry)
unload_audio(out)
```